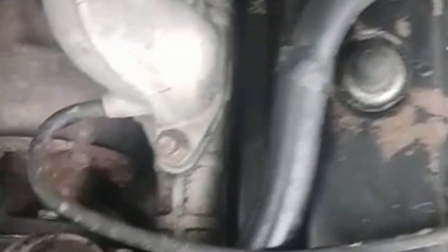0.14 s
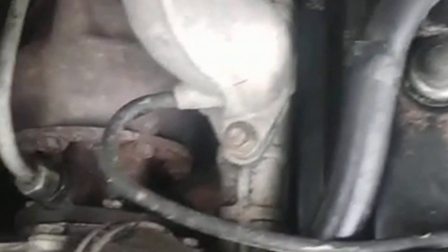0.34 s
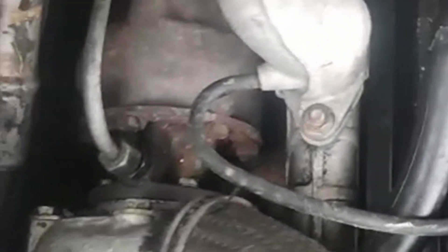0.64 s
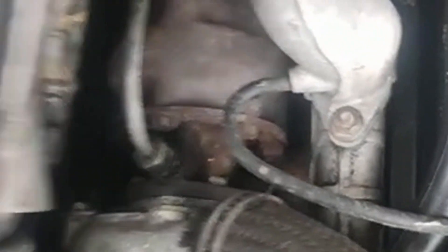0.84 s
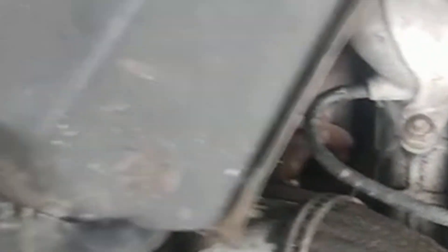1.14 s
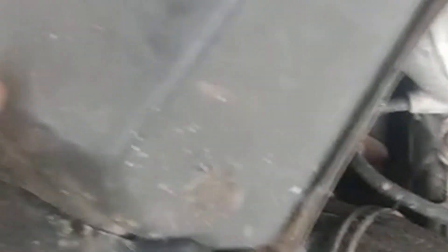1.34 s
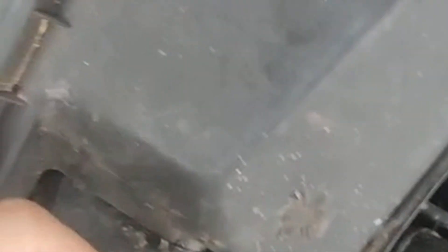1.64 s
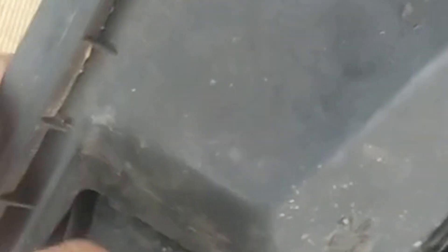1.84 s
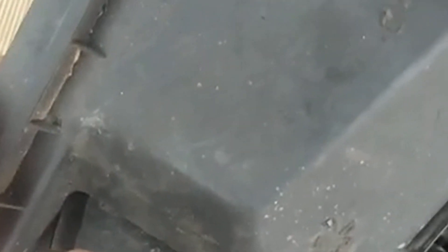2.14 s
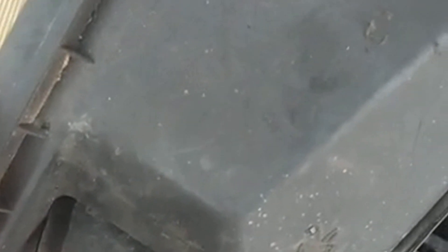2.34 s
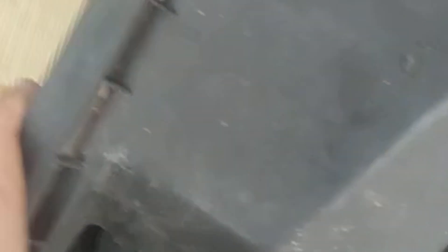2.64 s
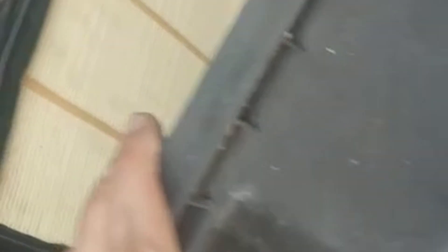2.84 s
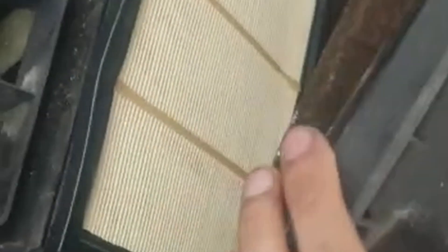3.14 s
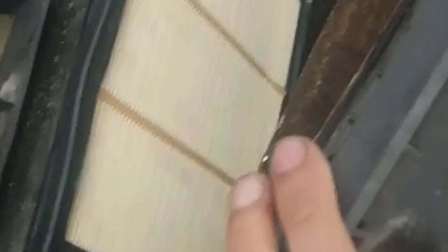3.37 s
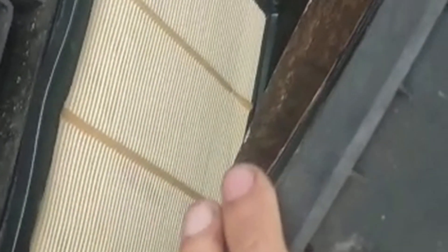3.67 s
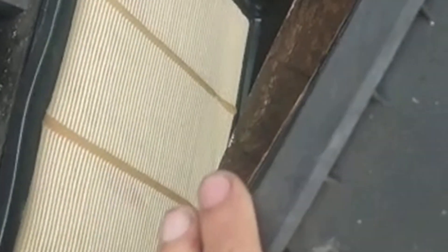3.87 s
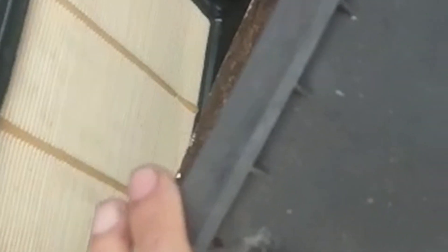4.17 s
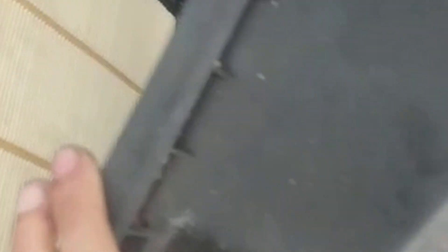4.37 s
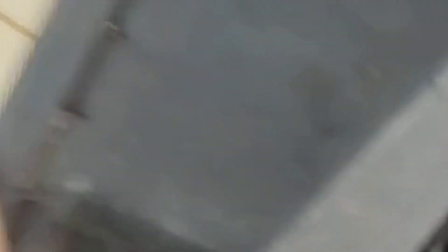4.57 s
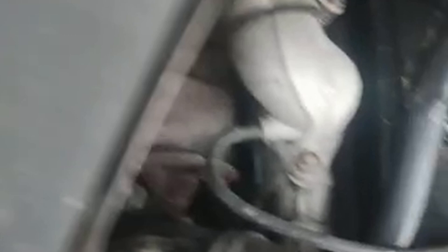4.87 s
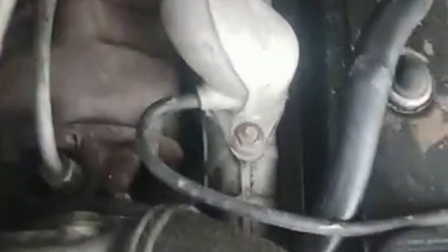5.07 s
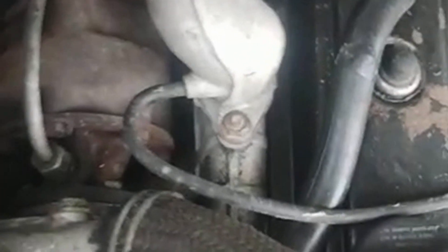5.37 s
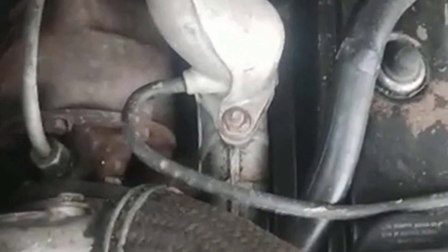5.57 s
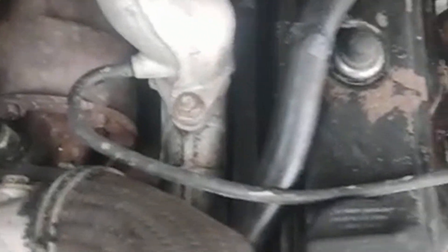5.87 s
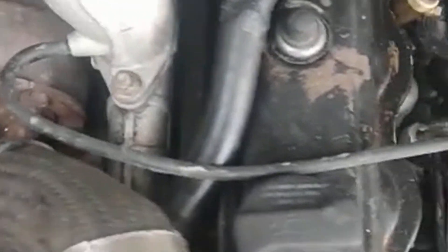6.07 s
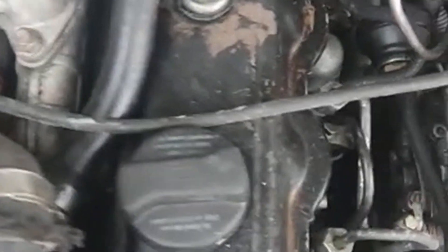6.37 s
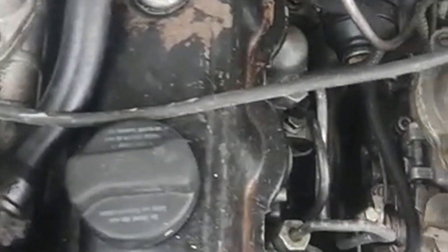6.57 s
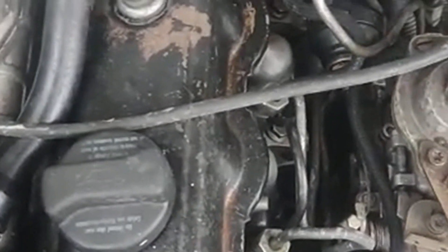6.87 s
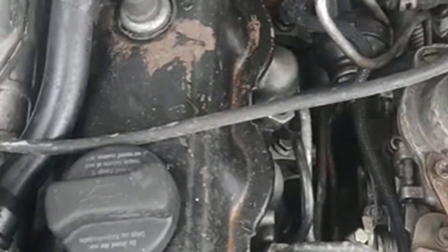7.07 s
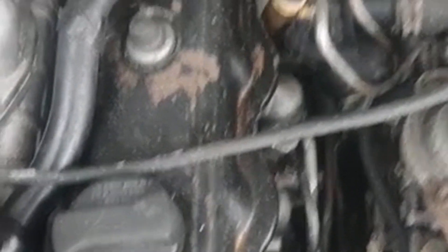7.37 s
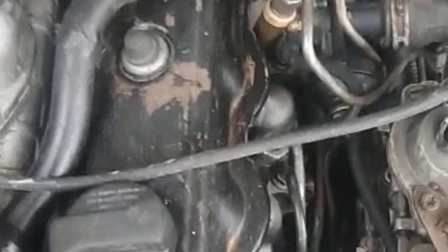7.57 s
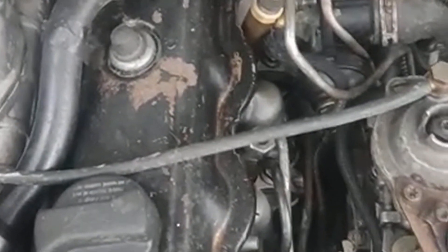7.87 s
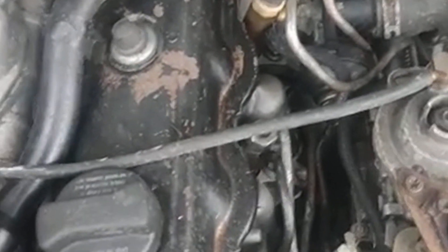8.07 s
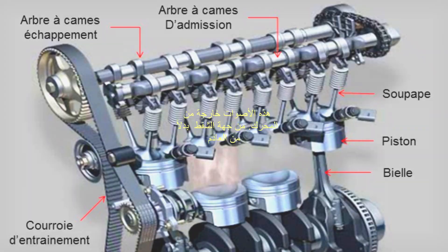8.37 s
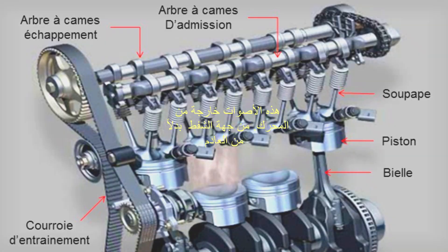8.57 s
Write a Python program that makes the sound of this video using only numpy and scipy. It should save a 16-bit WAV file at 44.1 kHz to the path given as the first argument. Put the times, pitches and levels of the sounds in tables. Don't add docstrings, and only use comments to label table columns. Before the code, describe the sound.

From the first instant a worn four-cylinder diesel idles loudly, close to a handheld stereo microphone in an open engine bay. About seven times a second a hard, low puff of intake air thumps, with three weaker puffs between, giving a lumpy, galloping rhythm that wavers only slightly. Between them injectors and valves knock brightly on iron over continuous gritty clatter, low rumble and hum. From 0 to 1 s the microphone leaves the block, and the treble softens. Around 1 to 3 s, beside the plastic air box, thuds and a faint whine come forward; from about 3 to 4.5 s, with the lid open, they are hollowest and strongest. By 5 to 6 s the box closes, and towards 7 s the bright, hard clatter returns over the block. It holds steady until about 8.2 s, when it cuts instantly to silence until the end.

```python
import sys
import numpy as np
from scipy import signal
from scipy.fft import rfft, irfft
from scipy.io import wavfile
from scipy.ndimage import uniform_filter1d

SR = 44100
rng = np.random.default_rng(int(sys.argv[2]) if len(sys.argv) > 2 else 0)


def to_linear_factor(level_db):
    exponent = np.asarray(level_db, float) / 20
    return 10 ** exponent


def wav_record(signal):
    frames = np.transpose(np.atleast_2d(signal))
    bounded = np.clip(frames, -1, 1)
    quanta = np.round(bounded * 32767).astype(np.int16)
    wavfile.write(sys.argv[1], SR, quanta)


N = 384542
T = np.arange(N) / SR
HZ = np.fft.rfftfreq(N, 1 / SR)
LEFT_LAG_MS = .22


def filtered(x, gain):
    return irfft(rfft(x) * gain, N)


def read(points, hz):
    f, value = np.transpose(points)
    return np.interp(np.log(hz + 1), np.log(f + 1), value)


def evened(x):
    return x / np.sqrt(np.mean(x ** 2) + 1e-20)


# time in seconds, spot (0 over the block, 1 beside the shut air box, 2 beside it open).
MIC_SPOT = [(0, .1), (.5, .5), (1.2, 0.92), (2.0, 1.2), (2.7, 1.07), (3.1, 1.6), (3.4, 2), (4.2, 1.68),
            (4.7, 1.6), (5.1, 0.94), (5.8, .95), (6.3, 0.28), (6.9, 0.059), (8.3, 0.083)]


def at_spot(trio, s):
    spot = np.interp(s, *np.transpose(MIC_SPOT))
    return np.interp(spot, np.arange(len(trio)), trio)


# time in seconds, lateness of the crank against a steady idle in ms.
GOVERNOR_HUNT = [(.1, -.5), (.51, -.8), (1.05, 1.8), (1.32, 1.9), (1.72, -1.5), (3.62, 1.1), (3.89, -.1),
                 (4.7, 0), (5.51, -1), (5.78, -2), (6.59, 2.1), (7.27, 0), (7.94, -.7), (8.08, 0)]
FIRST_S, CYCLE_S, CYCLE_COUNT = -.03407, .135241, 62


def cycles():
    steady = FIRST_S + CYCLE_S * np.arange(CYCLE_COUNT)
    return steady + np.interp(steady, *np.transpose(GOVERNOR_HUNT)) / 1000


def beats(share, jitter_ms):
    s = cycles()
    return s[:-1] + share * np.diff(s) + jitter_ms / 1000 * rng.standard_normal(len(s) - 1)


def strokes_db(trio, vary_db):
    return at_spot(trio, cycles()) + vary_db * rng.standard_normal(CYCLE_COUNT)


def train(s, size):
    out = np.zeros(N + SR)
    at = np.round(s * SR).astype(int)
    out[at[at >= 0]] = size[at >= 0]
    return out[:N]


# frequency in Hz, left-right correlation.
PORT_LIKENESS = [(30, 0.94), (200, 0.54), (600, 0.58), (1100, 0.5), (2000, 0.053), (4000, 0.033),
                 (12000, 0.08)]


def pair_noise():
    a, b = rfft(rng.standard_normal((2, N)))
    same = np.clip(read(PORT_LIKENESS, HZ), -1, 1)
    left = a * np.exp(-2j * np.pi * HZ * LEFT_LAG_MS / 1000)
    return np.array([left, same * a + np.sqrt(1 - same ** 2) * b])


KNOCK_LATE_MS = (-3.7, 0.093, .6)


def knock_power(rows, cycle_db, spread_db, rise_ms, snap):
    t_ms, power = np.arange(3000) / SR * 1000, 0
    for share, fade_ms, *db in rows:
        fade = np.exp(-t_ms / fade_ms) + snap * np.exp(-t_ms / 3.03)
        shape = (1 - np.exp(-t_ms / rise_ms)) ** 2 * fade
        at = beats(share, 0.81)
        at = at + at_spot(KNOCK_LATE_MS, at) / 1000
        blow, *colour = rng.standard_normal((len(at), 1 + len(db))).T
        size = to_linear_factor(2 * (cycle_db + spread_db * (blow + 0.33 * np.array(colour))))
        knocks = [signal.oaconvolve(train(at, v), shape)[:N] for v in size]
        power = power + to_linear_factor(2 * np.array(db))[:, None] * knocks
    return power


# frequency in Hz, density in dB per Hz.
RUMBLE_COLOUR = [(15, -5), (30, 2), (45, -8), (64, -3.5), (140, -6), (250, -4), (330, -7.5), (600, -8.5),
                 (800, -12), (1100, -54)]
# frequency in Hz, width in Hz, level over the whine in dB left, then right.
BAY_HOLLOWS = [(719.7, 20, -2.5, 0.5), (1046, 45, -7.5, 0)]
# share of the cycle, fade in ms, level in dB.
BAY_SHAKES = [
    [(.09, 10, 6), (.35, 16, 11), (.64, 16, 14)],
    [(.1, 14, 6.5), (.35, 14, 10), (.6, 14, 7.5), (.84, 14, 9)],
]
WHINE_DB = (-53.5, -39, -36)
HOLLOW_DB = (0.5, 0.3, -4.5)


def shafts():
    s = cycles()
    turns = uniform_filter1d(np.interp(T, s, np.arange(len(s))), size=3001)
    hum = to_linear_factor(-32.0) * np.sin(2 * np.pi * 4 * (turns + 0.0083))
    flutter = to_linear_factor(2.0 * evened(uniform_filter1d(rng.standard_normal(N), 2500)))
    whine_order = 46
    tones = flutter * np.sin(2 * np.pi * whine_order * turns) * to_linear_factor([[4], [0]])
    for (hz, width_hz, *db), shakes in zip(BAY_HOLLOWS, BAY_SHAKES):
        swell = evened(np.sqrt(.2 + knock_power(shakes, 0, 0.89, 3.3, snap=0)))
        shaken = to_linear_factor(at_spot(HOLLOW_DB, T)) * swell
        resonance = evened(irfft(pair_noise() / (1 + ((HZ - hz) / width_hz * 2) ** 2), N))
        tones = tones + to_linear_factor(np.array(db))[:, None] * shaken * resonance
    rumble = to_linear_factor(-31.5) * evened(irfft(pair_noise() * to_linear_factor(read(RUMBLE_COLOUR, HZ)), N))
    puffs = [(1.0, 11, 8.6), (.72, 23, 7.1), (0.4, 12, 1)]
    rumble *= evened(np.sqrt(1 + knock_power(puffs, 0, .5, 1.7, snap=0)))
    return hum * to_linear_factor([[.5], [-.5]]) + to_linear_factor(at_spot(WHINE_DB, T)) * tones + rumble


KNOCK_HZ = [1300, 2200, 5000, 12000]
BED_DB = [(-35, -39, -42), (-29, -31.5, -35), (-25.5, -27, -29), (-27, -30, -34)]
# share of the cycle, fade in ms, level over the bed in dB in the four bands.
LIGHT_KNOCKS = [
    (.088, 12.1, 11.5, 4.2, 2.8, 8.3),
    (.345, 10.1, 11.5, 4.9, 7.8, 9.8),
    (.58, 22.4, 10, 4.5, 2.4, 5.5),
]
# share of the cycle, fade in ms, level over the heavy level in dB in the four bands.
HEAVY_KNOCKS = [
    (.745, 15.6, -16, -11.5, -0.9, 0.94),
    (.84, 5.46, -4.5, -3, 3, 0.84),
]
# frequency in Hz, density in dB per Hz.
IRON_COLOUR = [(440, -16), (750, -6), (828, -7), (1030, -5), (1180, -6.5), (2210, 3.5), (2540, 0.5),
               (2870, 1), (5050, -6), (7130, -3), (7870, 0), (9940, -0.5), (12100, -7.5), (14200, -7)]


def clatter():
    bed = to_linear_factor(2 * np.array([at_spot(db, T) for db in BED_DB]))
    heavy_db = strokes_db((-11, -11, -11.5), vary_db=.5)[1:]
    power = bed * (0.69 + knock_power(LIGHT_KNOCKS, 0, 0.34, 3.58, snap=1.9))
    power += knock_power(HEAVY_KNOCKS, heavy_db - 8.5, 0.69, 4.2, snap=2.1)
    touches = rng.standard_normal((2, N)) + rng.standard_normal(N)
    grit = to_linear_factor(0.87 * evened(uniform_filter1d(touches, 60, axis=1)))
    noise, out = pair_noise() * to_linear_factor(read(IRON_COLOUR, HZ)), 0
    for pick, strength in zip(np.eye(len(KNOCK_HZ)), np.sqrt(power)):
        band = irfft(noise * read(list(zip(KNOCK_HZ, pick)), HZ), N)
        out = out + evened(band * grit) * strength
    return out


def patchy(x, depth_db):
    z = signal.stft(x, nperseg=512, noverlap=384)[2]
    patches = uniform_filter1d(rng.standard_normal(z.shape), size=2, axis=1)
    patches = uniform_filter1d(patches, size=7, axis=2)
    return signal.istft(z * to_linear_factor(depth_db * evened(patches)), nperseg=512, noverlap=384)[1][:, :N]


# frequency in Hz, level in dB, t60 in seconds.
BLOCK_MODES = [(1100, -30, 0.049), (1812, -25, 0.046), (2264, -33, 0.059), (2280, -21, 0.038),
               (2775, -35.5, 0.33), (3240, -29.5, 0.056), (7730, -16, 0.016), (8900, -32.5, 0.0067)]


def block():
    t, out = np.arange(3000) / SR, np.zeros((2, N))
    for hz, db, t60_s in BLOCK_MODES:
        at = beats(.83, 2.7)
        ring = to_linear_factor(db - 60 * t / t60_s) * (1 - np.exp(-t / 0.0023)) * np.sin(2 * np.pi * hz * t)
        for side in out:
            strength = 3 * np.tanh(rng.standard_normal(len(at)))
            side += signal.oaconvolve(train(at, strength), ring)[:N]
    return out


# share of the cycle, peak in dB.
MILD_PUFFS = [
    (0.242, -15.5),
    (0.474, -13.5),
]
LAST_PUFF_SHARE = .735


def air_box():
    thud_hz = (620, 603.5, 587)
    thud_db, ring_db = (-27.5, -22.5, -15.5), (-19.5, -39.5, -31.5)
    cover_hz, cover_t60_s, peak_s = 639, .15, .0085
    t, out = np.arange(8000) / SR, np.zeros((2, N))
    late = t - np.array([[LEFT_LAG_MS / 1000], [0]])
    # time s, thud dB, ring dB
    blows = [(at, 0, 0) for at in cycles()[1:-1]]
    blows += [(at, -10.5, -14) for at in beats(LAST_PUFF_SHARE, .3)]
    blows += [(at, db, -16) for share, db in MILD_PUFFS for at in beats(share, .3)]
    for at, soft_db, damped_db in blows:
        hz, thud_level_db, ring_level_db = (at_spot(trio, at) for trio in (thud_hz, thud_db, ring_db))
        vary_db, detune = rng.standard_normal(2) * [.6, .006]
        turns = hz * (1 + detune) * late - 5500 * (late - peak_s) ** 2
        swell = np.exp(-((t - peak_s) / 0.004) ** 2 / 2)
        thud = to_linear_factor(thud_level_db + soft_db) * swell * np.sin(2 * np.pi * turns)
        ring = to_linear_factor(ring_level_db + damped_db - 60 * t / cover_t60_s) * (1 - np.exp(-t / 0.0045))
        ring = ring * np.sin(2 * np.pi * cover_hz * late)
        part = out[:, max(round((at - .004) * SR), 0):][:, :len(t)]
        part += (thud * to_linear_factor([[-4], [0]]) + ring)[:, :part.shape[1]] * to_linear_factor(vary_db)
    return out


# delay in ms, signed gain.
DUCT_ECHOES = [(15.8, -0.19), (24.1, -0.07)]
# frequency in Hz, t60 in seconds, level in dB.
PAN_MODES = [(310.3, 0.11, -0.7), (444, .1, 0.5)]
PAN_DB = (-24.5, -36.5, -38)
PUFF_LAG_MS = (.03, 0.1, .2)


def intake():
    puff_hz, puff_ms, skew_rad = 173.6, 2.24, 0.12
    lid_echo, lid_push = (.29, 0.078, .05), (.05, 0.079, .12)
    s = cycles()
    hard_db = strokes_db((-4.5, -4, -3.5), vary_db=.5)
    last_db = strokes_db((-14, -11.5, -10), vary_db=1.4)
    last = train(beats(LAST_PUFF_SHARE, 0.14), to_linear_factor(last_db[1:]))
    drive = train(s, to_linear_factor(hard_db)) + last
    for share, db in MILD_PUFFS:
        drive += train(beats(share, 0.2), to_linear_factor(db + .6 * rng.standard_normal(len(s) - 1)))

    u = np.arange(-500, 501) / SR
    puff = -np.exp(-(u * 1000 / puff_ms) ** 2 / 2) * np.cos(2 * np.pi * puff_hz * u + skew_rad)
    direct = signal.oaconvolve(drive, puff / -puff.min(), "same")
    push = -np.exp(-(u / 0.0015) ** 2 / 2) * np.cos(2 * np.pi * 70 * u)
    direct += at_spot(lid_push, T) * signal.oaconvolve(drive + .9 * last, push, "same")
    echoes = [(8.1, at_spot(lid_echo, T))] + DUCT_ECHOES
    air = direct + sum(gain * np.roll(direct, round(ms * SR / 1000)) for ms, gain in echoes)

    t = np.arange(5000) / SR
    hollow = to_linear_factor(-7 - 60 * t / 0.069) * (1 - np.exp(-t / 0.0042)) * np.sin(2 * np.pi * 281 * t)
    hollow = signal.oaconvolve(np.roll(drive, -round(0.0015 * SR)), hollow)[:N]
    pan = sum(to_linear_factor(db - 60 * t / t60_s) * np.sin(2 * np.pi * hz * t) for hz, t60_s, db in PAN_MODES)
    pan = (1 - np.exp(-t / 0.0025)) * pan
    air += signal.oaconvolve(np.sqrt(drive) * to_linear_factor(at_spot(PAN_DB, T)), pan)[:N]
    left = np.interp(T - at_spot(PUFF_LAG_MS, T) / 1000, T, air) + hollow
    return np.array([left, to_linear_factor(-1.0) * air])


# frequency in Hz, dB added left and taken off right, halved.
PORT_LEAN = [(800, 2), (1500, -1), (2500, 1), (3500, 1), (4500, -0.5), (6500, -7), (9000, -2), (12000, 5),
             (14000, -1.5)]


def scene():
    lean = to_linear_factor(np.array([[.5], [-.5]]) * read(PORT_LEAN, HZ))
    iron = filtered(patchy(clatter(), depth_db=2.28) + block(), lean)
    return shafts() + iron + air_box() + intake()


# frequency in Hz, share lost.
BAND_LOSS = [(2300, 0), (3600, .12), (5300, .12), (6300, 0), (10300, 0.039), (11500, 0.22), (14300, 0.44)]


def starved(x):
    hz, _, z = signal.stft(x, SR, "cosine", nperseg=2048, noverlap=1024)
    luck = np.repeat(rng.random((129, z.shape[2])), repeats=8, axis=0)[:len(hz)]
    wide = np.repeat(rng.random((43, z.shape[2])), repeats=24, axis=0)[:len(hz)]
    luck = np.where(hz[:, None] > 8000, np.minimum(luck, 2 * wide), luck)
    luck = 2 * np.minimum(luck, np.roll(luck, shift=1, axis=1))
    kept = z * (luck > read(BAND_LOSS, hz)[:, None])
    return signal.istft(kept, SR, "cosine", nperseg=2048, noverlap=1024)[1][:, :N]


def band_limit(x):
    return signal.sosfilt(signal.butter(12, 15330, fs=SR, output="sos"), x)


def record(dry):
    edge_hz, cut_s = 14350, 8.2135
    squeezed = 1.388 * np.tanh(dry / 1.196)
    shelf = np.where(HZ > edge_hz, to_linear_factor(-32 - (HZ - edge_hz) / 24), HZ > 12)
    cut = starved(filtered(squeezed, shelf)) * np.clip((cut_s - T) / .001, 0, 1)
    mix = np.clip(cut, -1, 1)
    return band_limit(mix)


dry = scene()
out = record(dry)
wav_record(out)
```